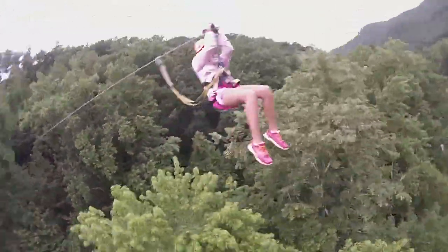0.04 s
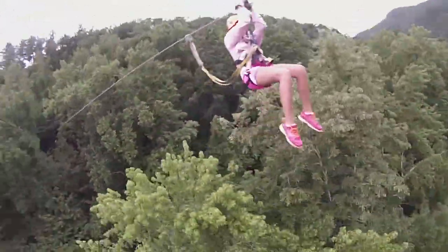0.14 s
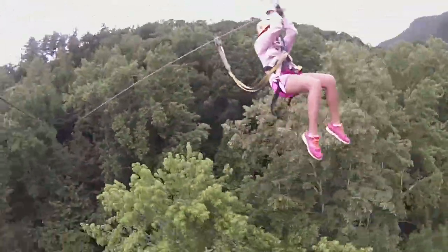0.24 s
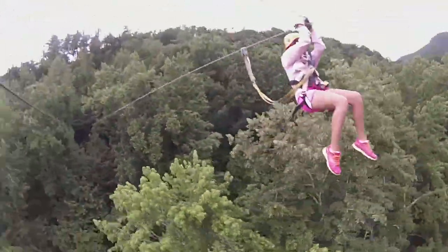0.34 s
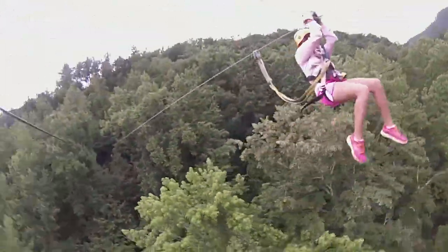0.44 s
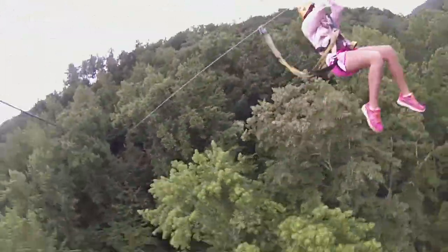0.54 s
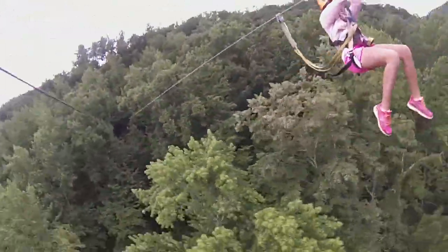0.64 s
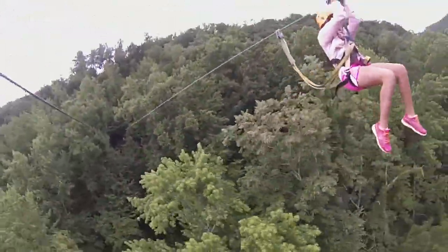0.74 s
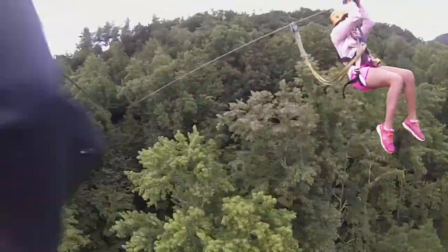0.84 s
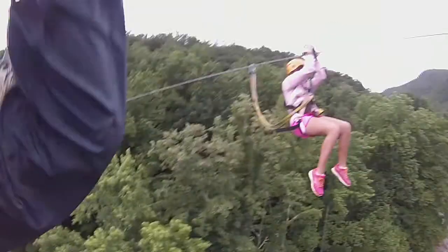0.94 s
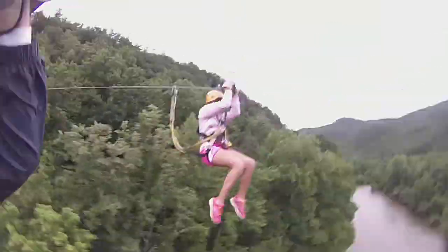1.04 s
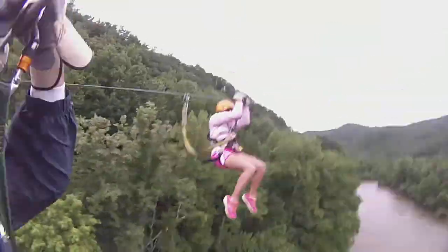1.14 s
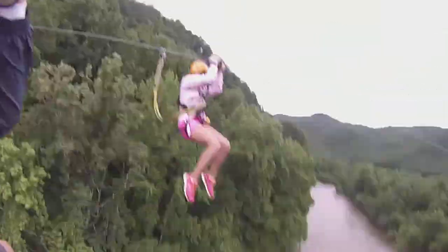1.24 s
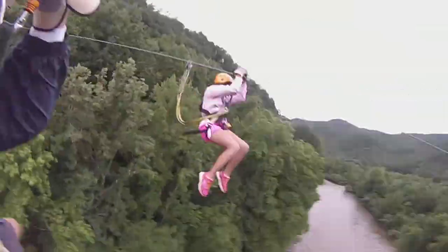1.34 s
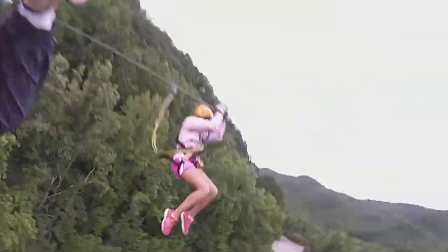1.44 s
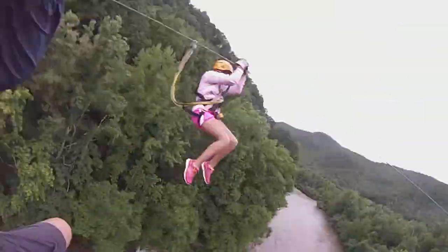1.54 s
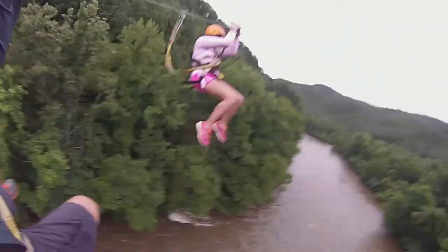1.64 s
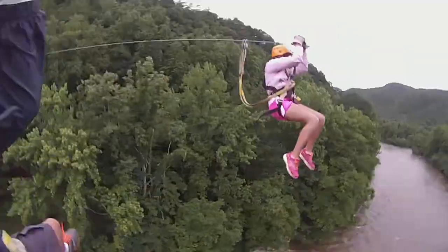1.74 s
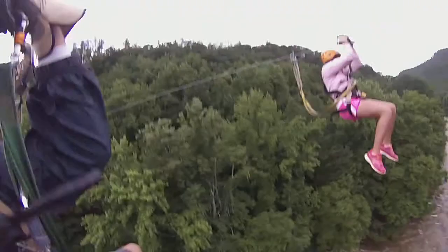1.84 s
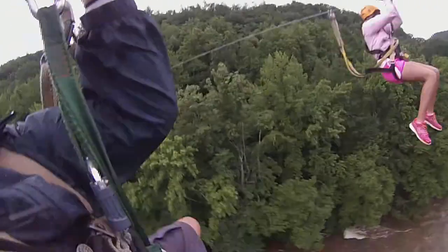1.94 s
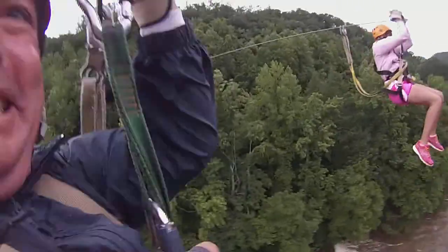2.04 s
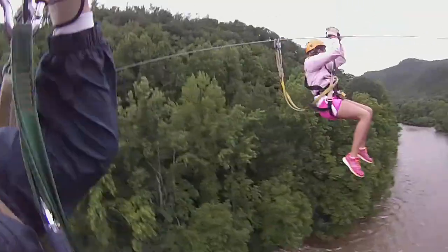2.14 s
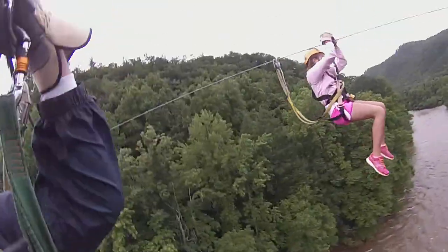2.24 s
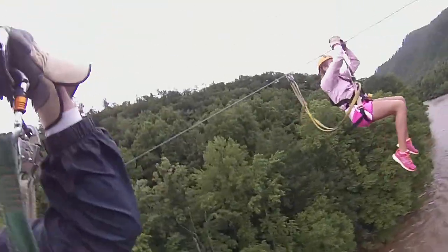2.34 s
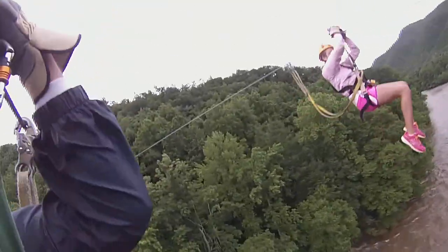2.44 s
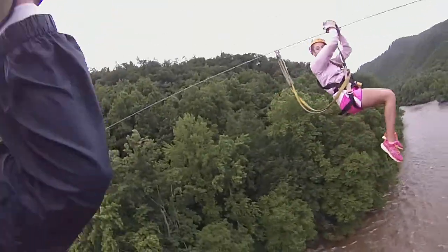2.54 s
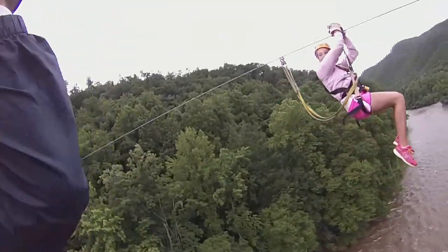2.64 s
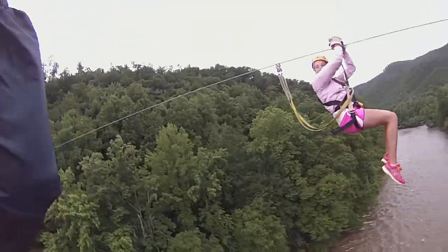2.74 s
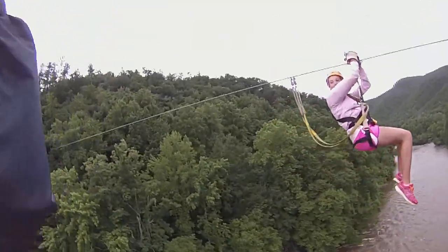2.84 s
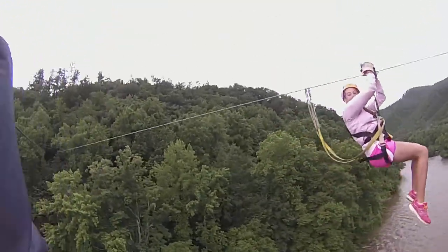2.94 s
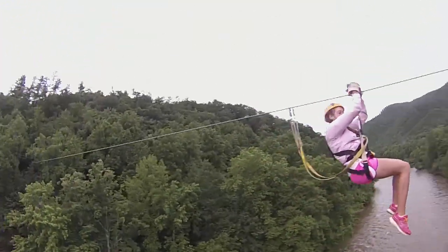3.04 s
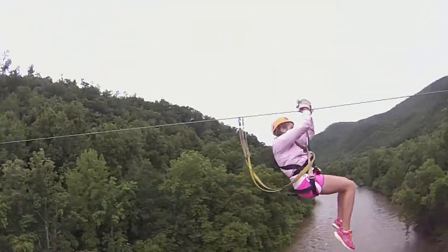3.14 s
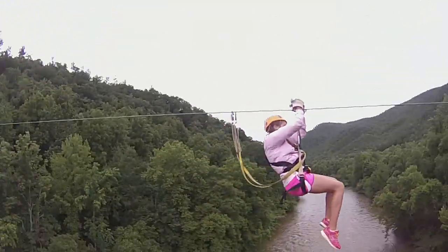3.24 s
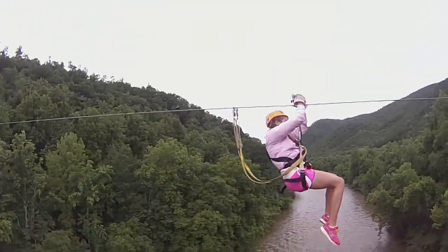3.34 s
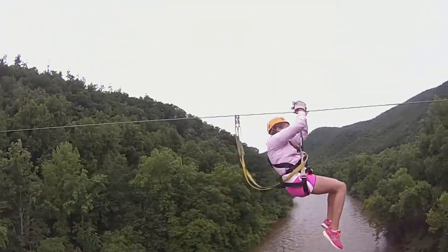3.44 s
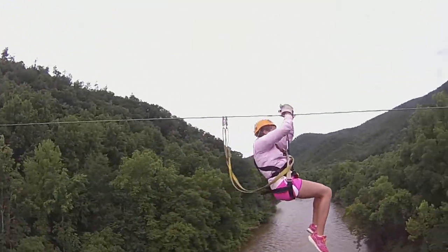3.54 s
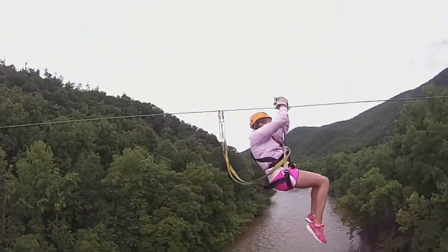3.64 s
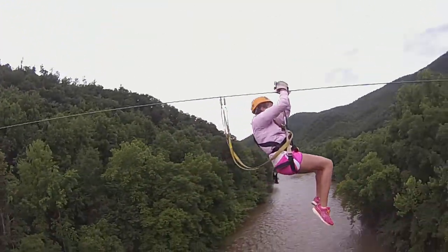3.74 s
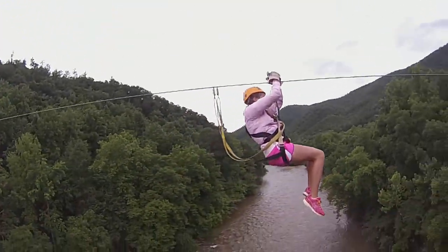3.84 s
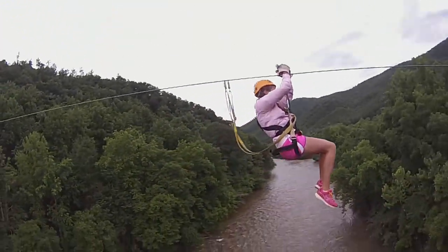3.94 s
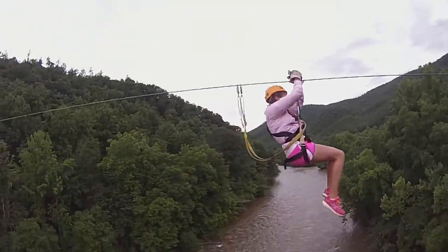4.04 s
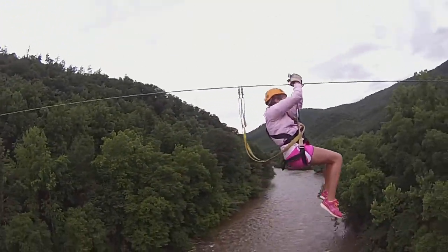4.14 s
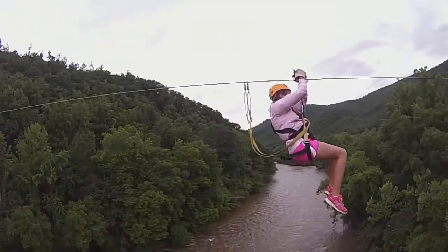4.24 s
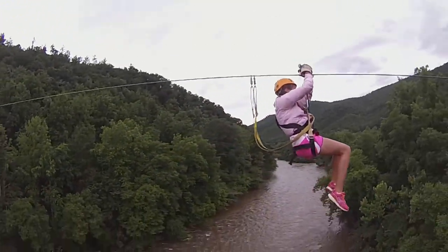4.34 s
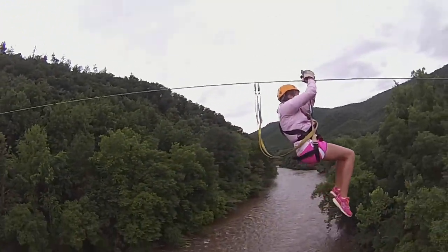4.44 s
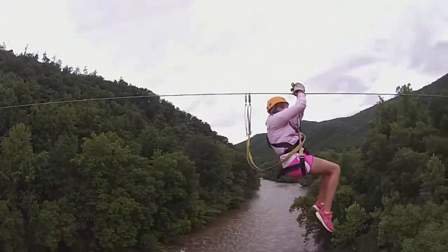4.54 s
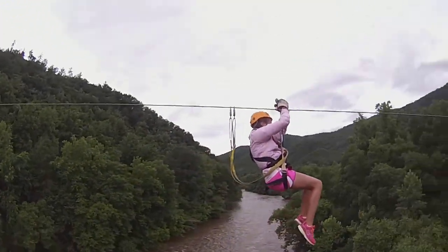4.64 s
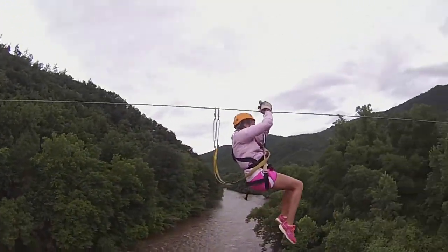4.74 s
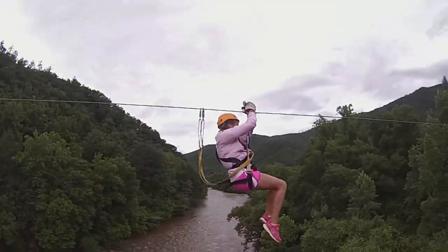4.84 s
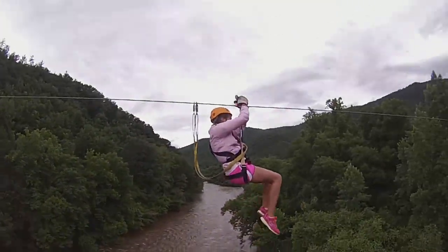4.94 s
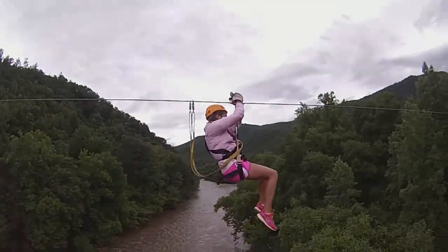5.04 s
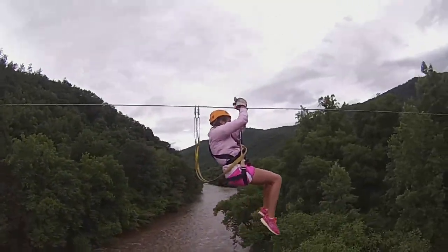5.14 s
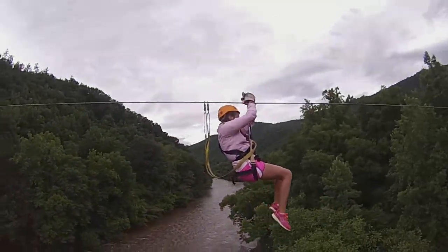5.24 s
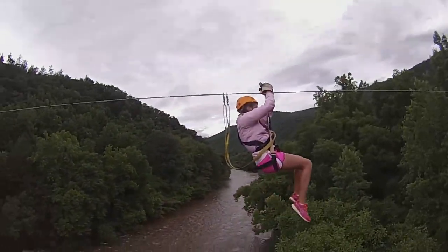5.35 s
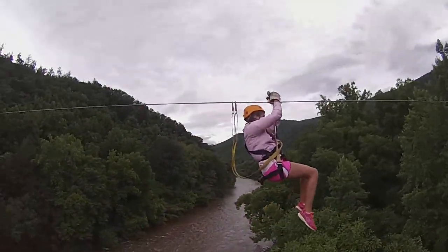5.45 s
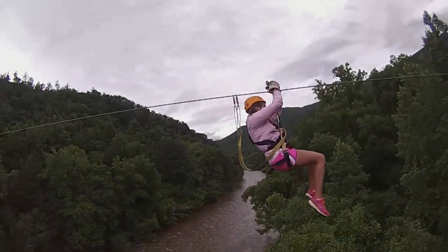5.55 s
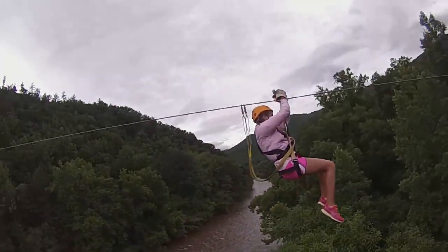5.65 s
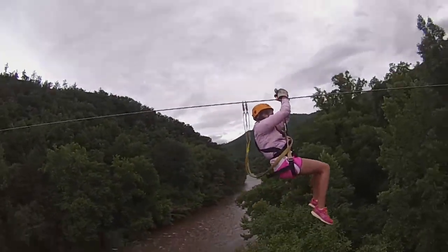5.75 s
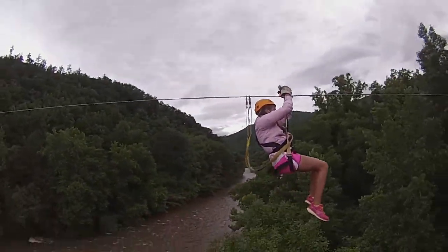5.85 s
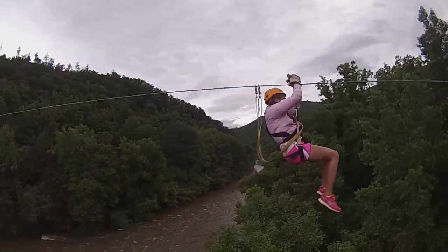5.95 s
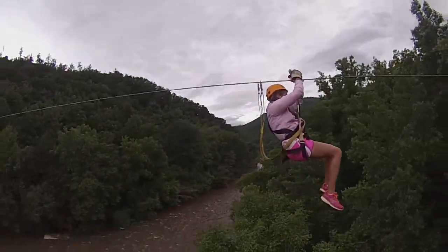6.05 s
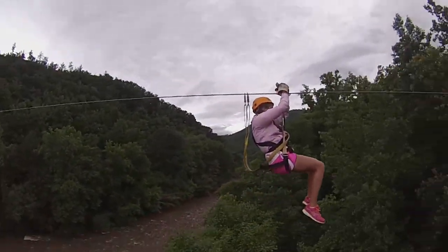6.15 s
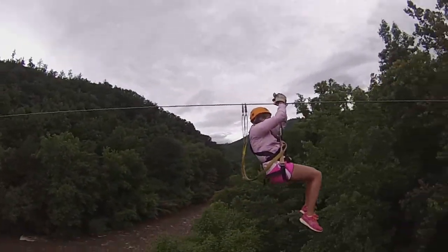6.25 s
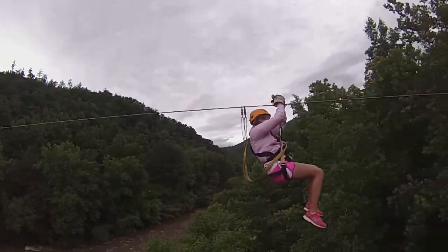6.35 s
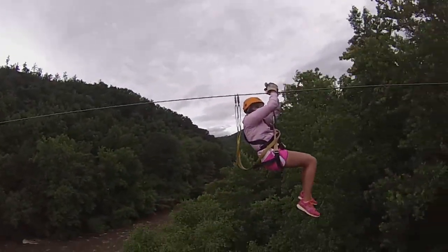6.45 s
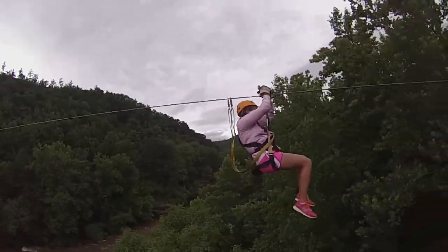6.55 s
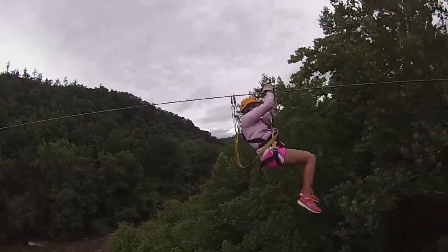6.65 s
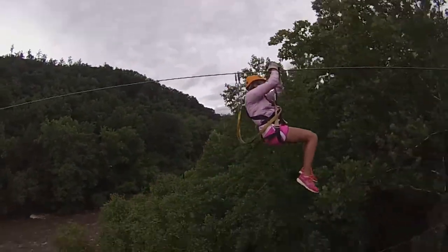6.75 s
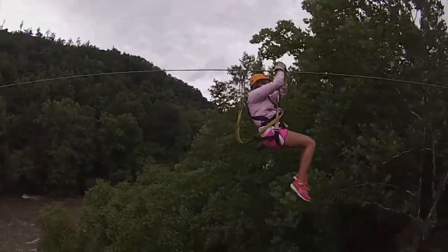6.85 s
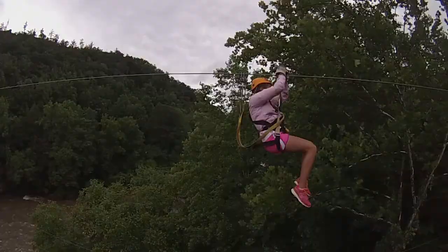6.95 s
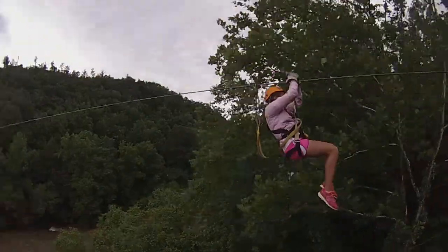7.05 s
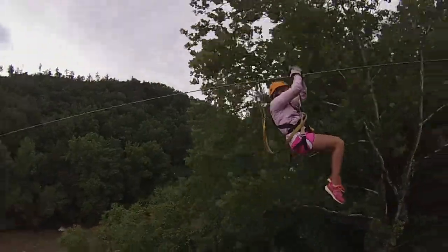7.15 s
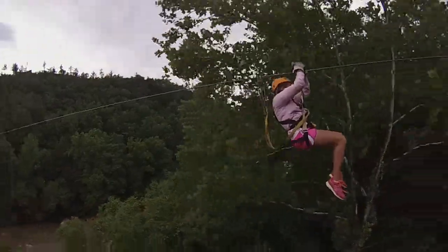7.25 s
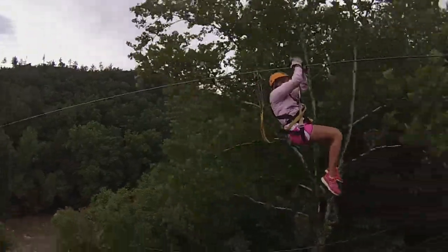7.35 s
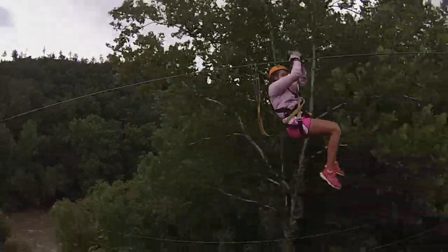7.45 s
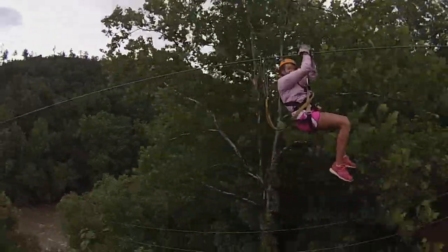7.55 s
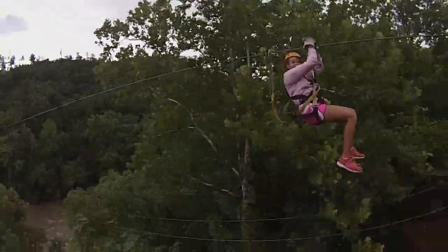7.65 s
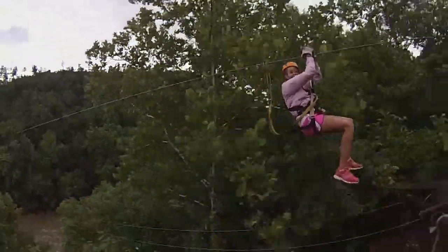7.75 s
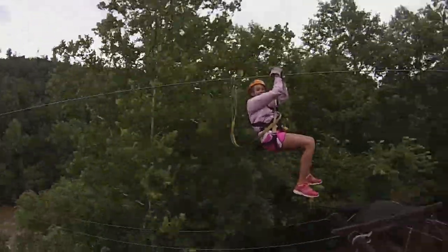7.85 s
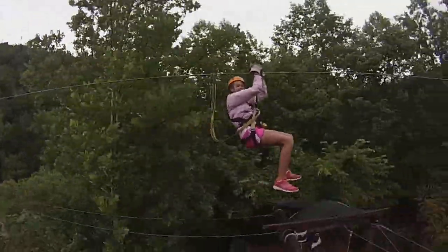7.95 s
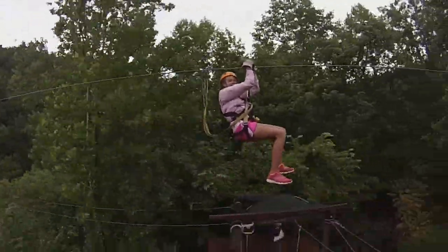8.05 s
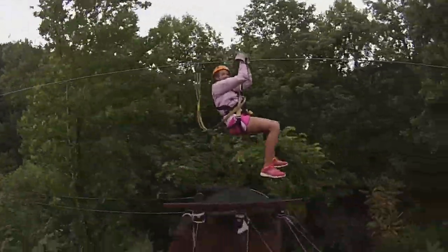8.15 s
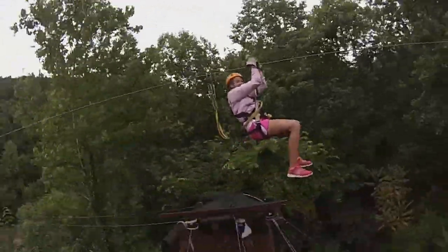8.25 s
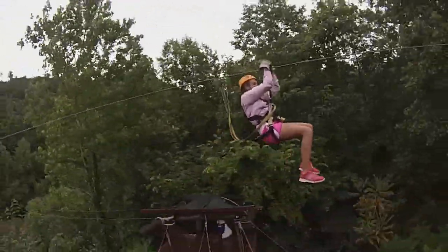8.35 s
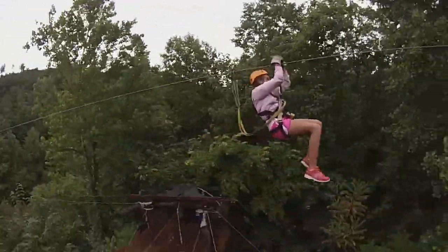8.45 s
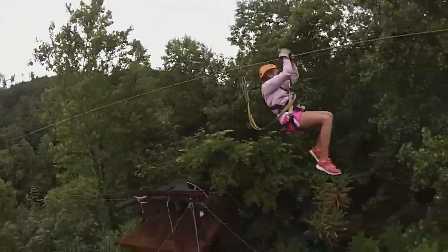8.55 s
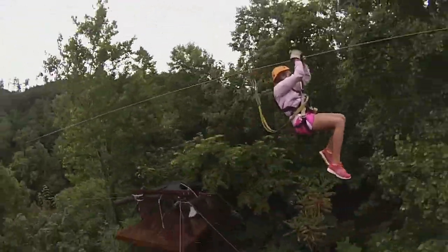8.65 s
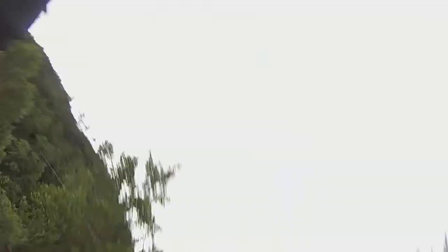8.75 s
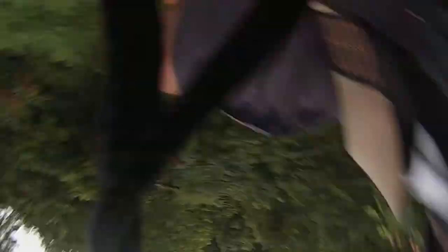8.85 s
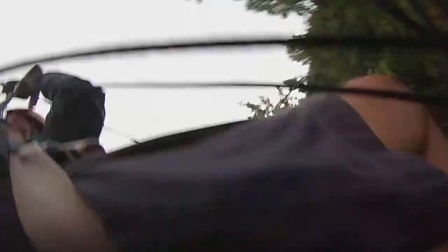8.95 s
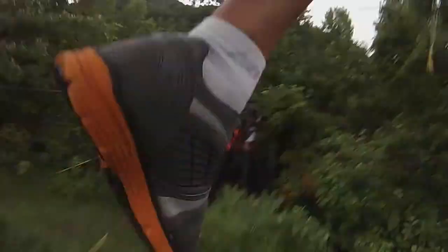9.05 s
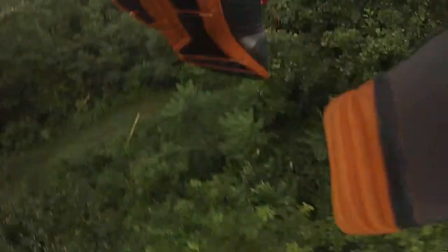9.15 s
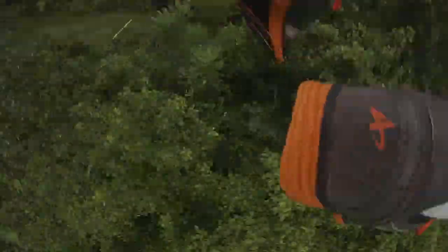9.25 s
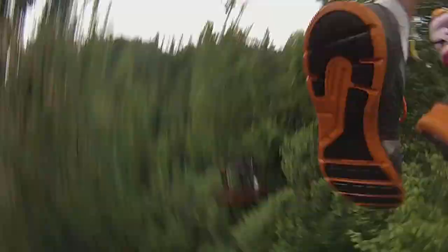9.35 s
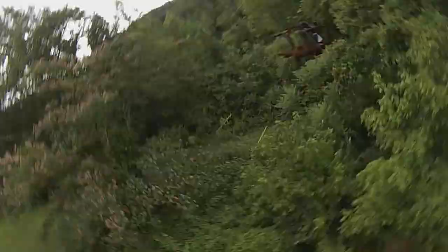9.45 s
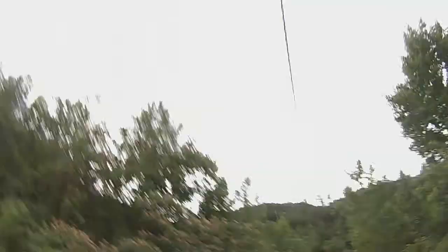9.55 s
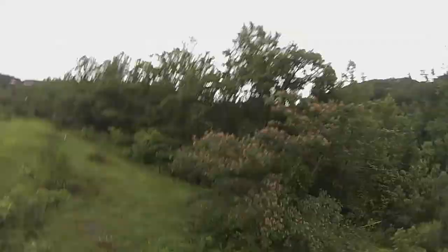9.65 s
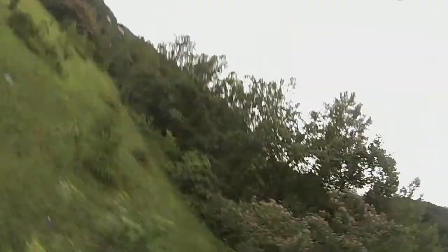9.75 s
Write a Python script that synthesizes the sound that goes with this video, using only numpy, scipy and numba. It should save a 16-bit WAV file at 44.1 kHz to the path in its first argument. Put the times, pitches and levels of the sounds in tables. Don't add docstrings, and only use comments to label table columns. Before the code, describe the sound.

A handheld camera's microphone rides high on a cable in open air. Gritty metallic hiss and rough gliding tones dominate, with low wind buffets strongest early. Bumps interrupt near one second; afterwards the wheel's whine becomes higher, brighter and pulsing as the cable bounces. Late jolts duck the sound, plastic casing and harness clatter sharply, then quiet muffled trolley noise remains.

```python
import sys
import numpy as np
from scipy import signal
from scipy.io import wavfile
from scipy.ndimage import uniform_filter1d
from numba import njit

SR = 44100
rng = np.random.default_rng(int(sys.argv[2]) if len(sys.argv) > 2 else 0)


def convert_level_to_amplitude(level_db):
    exponent = np.asarray(level_db, float) / 20
    return 10 ** exponent


def persist_wave(psi):
    counts = np.round(np.clip(psi, -1, 1) * 32767).astype(np.int16)
    wavfile.write(sys.argv[1], SR, np.atleast_2d(counts).T)


N = 431738
T = np.arange(N) / SR
DROP_S = 9.06
CRUISE_HZ = 900


def curve(table):
    s, *columns = np.transpose(table)
    return [np.interp(T, s, column) for column in columns]


@njit
def svf(x, hz, width):
    y, band, low = np.empty(len(x)), 0., 0.
    for i in range(len(x)):
        g, k = np.tan(np.pi * hz[i] / SR), width / hz[i]
        v = (band + g * (x[i] - low)) / (1 + g * (g + k))
        band, low, y[i] = 2 * v - band, low + 2 * g * v, k * v
    return y


def ring(hz, width_hz, size=N):
    hz = np.minimum(hz * np.ones(size), SR / 2.3)
    once = svf(rng.standard_normal(size), hz, 1. * width_hz)
    twice = svf(once, hz, 1. * width_hz)
    return twice / twice.std()


def walk(rate):
    hold = int(SR / rate)
    steps = np.repeat(rng.standard_normal(N // hold + 1), hold)
    return 1.3 * uniform_filter1d(uniform_filter1d(steps, hold), hold)[:N]


def tone(hz, width_hz, flicker_db):
    phase = 2 * np.pi * np.cumsum(hz + width_hz * walk(60)) / SR
    return np.sqrt(2) * convert_level_to_amplitude(flicker_db * walk(22)) * np.sin(phase)


def outside(s, length):
    return np.maximum(s - T, 0), np.maximum(T - s - length, 0)


def window(s, length, edge_s):
    return np.exp(-(sum(outside(s, length)) / edge_s) ** 2)


def spell(s, length, size):
    return size * window(s, length, 0.14)


def skirt_db(hz, centre_hz, width_hz):
    return -10 * np.log10(1 + ((hz - centre_hz) / width_hz) ** 4)


# start_s, level_db
WIND_BUFFETS = [(0.0, -30.5), (0.43, -41), (0.87, -28.5), (1.45, -22.5), (2.07, -23), (2.29, -32),
                (3.19, -33.5), (4.3, -43.5), (4.61, -37.5), (5.5, -40.5), (5.83, -35), (6.3, -48),
                (7.3, -38.5), (8.26, -40), (8.7, -36), (9.0, -42), (9.79, -47.5)]
# pitch_hz, level_db (per Hz)
RUSTLE_SPECTRUM = [(35, -29), (60, 3.5), (310, -15.5), (398, -19), (834, -19), (911, -4), (982, -35),
                   (1200, -26), (1560, -43), (2640, -120)]
# start_s, length_s, level_db
RUSTLE_GUSTS = [
    (0.302, 0.27, 3),
    (4.447, 0.13, 2.5),
    (5.2, 0.77, -0.5),
    (6.346, 0.055, 3.5),
    (7.449, .25, 4),
]


def wind():
    buffet_db = curve(WIND_BUFFETS)[0]
    rustle_db = -42.5 + 0.011 * (buffet_db + 42.5)
    rustle_db += spell(2.63, 0.3, -7)
    rustle_db += sum(spell(*row) for row in RUSTLE_GUSTS)
    gust = walk(11)
    buffet = ring(33.7, 18.7) + convert_level_to_amplitude(-14.5) * ring(67, 70) + convert_level_to_amplitude(5.5) * ring(15.1, 11.5)
    f, db = np.transpose(RUSTLE_SPECTRUM)
    rustle = np.zeros(N)
    for hz in 70 * 2 ** np.arange(0, 4.1, .5):
        band_db = np.interp(np.log(hz), np.log(f), db) + 1.7 * gust + 2.4 * walk(15)
        rustle += convert_level_to_amplitude(band_db) * np.sqrt(hz) * ring(hz, hz / 2)
    return convert_level_to_amplitude(buffet_db + 2.5 * gust) * buffet + convert_level_to_amplitude(rustle_db + 3.0) * rustle / rustle.std()


# start_s, pitch_hz, level_db
OTHER_TROLLEY = [(0, 1572, -37), (.55, 1631, -30.5), (.7, 1610, -34), (.76, 1625, -42), (1.1, 1640, -33),
                 (1.3, 1646, -25.5), (1.85, 1692, -36), (2.3, 1710, -48), (3.05, 1742, -33),
                 (4.2, 1772, -31), (5.5, 1850, -46), (6.35, 1812, -31), (7.4, 1792, -35.5),
                 (7.8, 1813, -47), (8.3, 1785, -34), (9, 1796, -32.5)]


def other_trolley():
    hz, level_db = curve(OTHER_TROLLEY)
    return convert_level_to_amplitude(level_db) * tone(hz, 2.88, flicker_db=2.0)


# start_s, level_db (peak), pitch_hz, decay_s
THUDS_IN = [(0.896, -2.5, 204, 0.0024), (0.907, 3.5, 56.4, 0.0086), (1.419, -7, 40, 0.0093),
            (1.4255, 0.5, 80, 0.0029), (1.548, -6, 92, 0.0065), (1.713, -22, 290, 0.002),
            (8.774, -3, 51.9, 0.011), (8.779, -6, 193, 0.0043), (9.0576, 12.5, 98, 0.0022),
            (9.15, -22, 70, .01), (9.164, -11, 126, 0.01), (9.184, -10, 170, .003),
            (9.179, -4, 480, 0.0025), (9.188, -5, 47, 0.011), (9.482, -18.5, 32, .03)]
# start_s, level_db (peak), pitch_hz, decay_s
THUDS_OUT = [(0.9, -1, 88.5, 0.016), (1.276, -4.5, 58, 0.0097), (3.192, -28, 287, 0.0096),
             (3.31, -24, 280, 0.01), (3.63, -31, 290, 0.011), (5.61, -14, 62.6, 0.011),
             (8.85, -5, 58, 0.017), (8.925, -9, 299, 0.0014), (8.952, -14, 220.5, 0.0018),
             (9.061, 4, 39.7, 0.0045), (9.1794, 5.5, 160, 0.0025), (9.181, -5, 89, 0.0059),
             (9.505, -23, 76.4, 0.016), (9.59, -34, 90, 0.011), (9.75, -21, 40, .03)]


def thuds():
    out = np.zeros(N)
    for way, table in ((-0.92, THUDS_IN), (0.65, THUDS_OUT)):
        for s, db, hz, decay in table:
            t = np.maximum(T - s, 0)
            swing = np.sin(2 * np.pi * hz * t) * np.exp(-t / decay)
            out += way * convert_level_to_amplitude(db) * swing * np.tanh(t * hz * 8)
    return out


# start_s, level_db (drop)
LEVEL_DUCKS = [(0.909, 18.5), (0.97, 2), (1.431, 3.5), (1.566, 7), (8.78, 5.5), (8.8, 2), (8.897, 4),
               (8.968, 2.5), (9.0, 2.5), (9.03, 1.5), (9.043, 6), (9.0573, 11), (9.125, 10), (9.19, 6)]


def level_drop_db():
    drop_db, attack_s, recover_s = np.zeros(N), 0.0045, 0.07
    for s, db in LEVEL_DUCKS:
        t = np.maximum(T - s, 0)
        drop_db += db * (1 - np.exp(-t / attack_s)) * np.exp(-t / recover_s)
    return drop_db


def add_knock(out, s, db, hz, width_hz, rise_s, decay_s, sharp):
    i = int(s * SR) - 2048
    t = T[i:i + 8192] - s
    burst = ring(hz, width_hz, size=8192)[:len(t)]
    if sharp:
        burst = 0.24 * burst - 2.57 * np.sin(2 * np.pi * hz * np.maximum(t, 0))
    out[i:i + 8192] += convert_level_to_amplitude(db) * burst * np.exp(np.where(t < 0, t / rise_s, -t / decay_s))


# start_s, level_db (rms), pitch_hz, decay_s
CASING_TICKS = [(1.43145, -10, 1530, 0.00054), (1.4316, -23, 2580, 0.00033), (9.057, -11.5, 1800, 0.00072),
                (9.0575, -14.5, 5000, 0.00044), (9.06, -24, 3330, 0.00076), (9.092, -33, 795, .002),
                (9.099, -24, 680, 0.014), (9.0995, -34, 3500, .0015), (9.099, -20, 1900, .0012),
                (9.104, -17.5, 1490, 0.0011), (9.106, -25, 1900, 0.00082), (9.116, -22, 880, 0.00072),
                (9.116, -28, 2300, .001), (9.12, -13.5, 1600, 0.0014), (9.1216, -14.5, 2470, 0.0011),
                (9.1198, -20, 5000, .001), (9.1208, -17, 7000, 0.00092), (9.145, -33, 3220, .002),
                (9.162, -28, 1300, 0.0017), (9.199, -26.5, 2240, .002), (9.5003, -25, 1300, 0.0007),
                (9.12, -37, 12000, 0.00092)]


def casing_ticks():
    out = np.zeros(N)
    for s, db, hz, decay in CASING_TICKS:
        add_knock(out, s, db, hz, min(1.2 * hz, 5000), .0003, decay, sharp=True)
    return out


# start_s, level_db (rms), pitch_hz, width_hz, decay_s
HARNESS_SCRAPES = [(.903, -30, 543, 500, .008), (1.95, -35, 4000, 3000, .03),
                   (1.231, -22.5, 3900, 1300, 0.055), (1.545, -21, 4400, 2500, 0.014),
                   (8.94, -25, 5000, 500, 0.044), (8.779, -27, 591, 700, 0.0096),
                   (8.851, -25, 1500, 2500, 0.016), (8.869, -21, 3500, 700, .006),
                   (8.869, -25, 1700, 1500, 0.0027), (8.885, -27, 680, 400, 0.0092),
                   (8.877, -18, 2200, 1500, 0.0039), (8.881, -22, 1230, 1200, 0.004),
                   (8.884, -27, 3460, 600, 0.0055), (8.888, -19, 2400, 1200, .003),
                   (8.894, -26, 1300, 1500, 0.0017), (8.894, -29, 3400, 700, .002),
                   (8.945, -27.5, 694, 300, 0.0044), (9.062, -14, 1790, 3000, 0.0027),
                   (9.095, -29, 1000, 1500, 0.0024), (9.122, -21, 4000, 5000, 0.0016),
                   (9.126, -26, 1900, 1500, 0.003), (9.139, -38, 1500, 2500, .003),
                   (9.15, -32, 3340, 900, 0.0063), (9.162, -37, 3300, 700, 0.0027),
                   (9.147, -46, 9000, 8000, .004), (9.159, -27, 1190, 1800, 0.0034),
                   (9.179, -29, 890, 1500, 0.0034), (9.199, -34, 2260, 900, 0.0027),
                   (9.195, -27.5, 1040, 1000, 0.0085), (9.11, -32, 1200, 2000, .004),
                   (9.454, -27, 2050, 600, .004), (9.462, -18, 2100, 600, 0.0035),
                   (9.47, -25, 2200, 700, .003), (9.463, -28.5, 3370, 700, 0.008),
                   (9.501, -28, 1290, 2020, 0.0028), (9.54, -34, 2150, 496, 0.0051),
                   (9.74, -38, 4140, 160, 0.055)]


def harness_scrapes():
    out = np.zeros(N)
    for s, db, hz, width, decay in HARNESS_SCRAPES:
        add_knock(out, s, db, hz, width, min(0.82 * decay, 0.012), decay, sharp=False)
    return out


# start_s (first crest), length_s, rate_hz, depth_hz (of strand rate)
CABLE_BOUNCES = [
    (3.06, .9, 8.6, 4),
    (4.22, .42, 8, 8),
    (5.04, .7, 9, 9),
    (5.88, 1.1, 9.2, 6),
    (7.065, .6, 8.9, 11),
    (7.75, .3, 9, 4),
    (8.13, .3, 9.1, 9),
    (8.5, .28, 8.3, 3),
]


def bounce():
    swing_hz = np.zeros(N)
    for s, length, rate, depth in CABLE_BOUNCES:
        swing_hz += depth * window(s, length, .04) * np.cos(2 * np.pi * rate * (T - s))
    return 1 + swing_hz / CRUISE_HZ


# start_s, length_s,
# pitch_hz, glide_hz_per_s, level_db
TROLLEY_STREAKS = [(0, .3, 1445, 150, -36), (.03, .07, 4090, -2500, -38), (.06, .11, 3690, -300, -35),
                   (.05, .1, 2135, 300, -39), (.76, .14, 3810, 0, -39), (1.02, .18, 2295, 450, -41),
                   (1.12, .2, 4890, 0, -39), (1.25, .35, 6100, 200, -45), (1.67, .09, 4310, 700, -34),
                   (1.8, .17, 4430, 900, -38), (1.82, .08, 3760, 0, -36), (1.83, .16, 1735, 0, -32),
                   (1.82, .1, 3310, -700, -39), (1.92, .04, 3260, 2000, -39), (1.96, .09, 3330, -1200, -38),
                   (1.8, .12, 4830, 900, -36), (7.78, .2, 4140, 0, -37), (6.3, .55, 3815, 90, -29),
                   (1.9, .1, 4610, 0, -34), (2.1, .2, 2415, 450, -37), (2.3, .15, 2512, 0, -36),
                   (2.14, .35, 1485, 100, -32), (2.17, .2, 4210, 300, -35), (2.29, .17, 4570, 0, -31),
                   (2.36, .17, 4335, 600, -32), (2.48, .15, 5385, 0, -31), (2.68, .42, 2465, 150, -35),
                   (3.1, .4, 3525, 200, -36), (3.2, .3, 3275, 100, -43), (4.0, .7, 2612, 30, -40),
                   (5.2, 1., 4755, 90, -32), (6.2, .8, 4810, 60, -28), (7.1, .8, 4885, 30, -32),
                   (7.95, .4, 5025, 0, -29), (6.4, .5, 5975, 60, -32), (5.8, 1., 5715, 50, -34),
                   (7.2, 1.4, 5575, 0, -33), (6.8, .2, 2755, 0, -37), (8.79, .055, 3750, -1500, -31),
                   (8.86, .04, 3600, -3000, -31), (8.27, .46, 2752, 50, -40), (8.935, .035, 5055, 0, -26),
                   (8.98, .045, 4955, 0, -29)]


def streaks():
    out, waver = np.zeros(N), bounce()
    for s, length, hz, glide, db in TROLLEY_STREAKS:
        span = slice(max(int((s - .1) * SR), 0), int((s + length + .1) * SR))
        t = T[span] - s
        pitch = (hz + glide * np.clip(t, 0, length)) * waver[span]
        level = convert_level_to_amplitude(db + 2.5 * walk(30)[span]) * window(s, length, .018)[span]
        line = np.sin(2 * np.pi * np.cumsum(pitch * (1 + .0035 * walk(50)[span])) / SR)
        out[span] += level * (1.5 * line + .4 * ring(pitch, hz / 35, size=len(t)))
    return out


# start_s, length_s, pitch_hz, glide_hz_per_s, level_db
GRIT_GLINTS = [(1.1, 0.27, 7000, -800, -37), (1.8, 0.24, 7700, -2800, -29), (2.5, 0.26, 5500, -1000, -28),
               (2.675, 0.41, 7450, 902, -28.5), (8.876, 0.15, 7500, 500, -29),
               (8.95, 0.044, 4500, 2001, -29.5), (1.197, .11, 1590, 397, -22.5), (3.1, .3, 3750, 0, -27.5),
               (1.21, .08, 10500, 0, -47), (1.85, 0.23, 11700, 0, -52), (2.1, .7, 11500, 0, -54),
               (1.8, 1.3, 10000, -300, -60), (2.15, .95, 11000, -1, -48), (1.16, .4, 8800, 0, -47),
               (8.9, .12, 9300, 3000, -40), (9.0, .035, 8800, 8000, -35.5), (8.82, .03, 7400, 4000, -38),
               (8.99, 0.038, 6000, 2, -29)]


def glints():
    out = np.zeros(N)
    for s, length, hz, glide, db in GRIT_GLINTS:
        pitch = hz + glide * np.clip(T - s, 0, length)
        out += convert_level_to_amplitude(db + 2.8 * walk(14.0)) * window(s, length, 0.022) * ring(pitch, hz / 11)
    return out


# start_s, level_db (trolley), brightness_db, facing (share 0-1)
CAMERA_POSE = [(0, -27.5, 0, 0.65), (.7, -28, -4.5, 0.3), (.88, -26, 0.5, 0.97), (1.03, -28.5, 0, 0.1),
               (1.28, -31, 5, 0.3), (1.45, -28.5, 2, 0), (1.74, -30.5, 4, 0.1), (1.86, -27, 2.5, 0.07),
               (2.4, -23.5, 5, 0.29), (2.7, -23.5, 5.5, 0.44), (3.4, -21.5, -1, 0.8), (4.5, -23, 3, 0.81),
               (5.9, -22.5, 4, 0.93), (6.5, -20.5, 3.5, 0.94), (7.8, -24.5, 5.5, 0.73),
               (8.772, -23, 4, 0.29), (8.79, -23.5, -0.5, 0.2), (9.05, -20.5, -2.5, 0.25)]


def pose():
    level_db, bright_db, facing = curve(CAMERA_POSE)
    down = T > DROP_S
    level_db = np.where(down, -34 + 1 * (T - DROP_S), level_db)
    return level_db, np.where(down, -6, bright_db), np.clip(facing, 0, 1)


# start_s, rate_hz (strands passing per second)
STRAND_RATE = [(0, 765), (.5, 778), (1.05, 765), (1.25, 796), (1.52, 820), (1.75, 800), (2.1, 805),
               (2.35, 840), (2.65, 840), (2.82, 826), (3.3, 857), (4.6, 880), (4.82, 896), (5.78, 903),
               (5.9, 914), (7.5, 926), (8.75, 925), (9.1, 914)]


def strand_rate():
    return curve(STRAND_RATE)[0]


# start_s, length_s, level_db (2nd strand multiple), level_db (4th)
WHEEL_SINGS = [(0.0, 0.14, -47, -64), (0.54, 0.16, -36, -46), (1.125, 0.19, -23, -33),
               (1.393, 0.3, -29.5, -56), (1.948, 0.044, -28, -34), (2.128, 0.47, -18.5, -31),
               (3.028, 0.058, -20.5, -40), (3.55, 0.074, -26.5, -57), (4.007, 0.15, -28.5, -41),
               (4.434, 0.14, -27.5, -53), (4.687, 0.3, -23, -39), (5.445, 0.065, -32, -49),
               (5.8, 0.24, -46, -28), (6.403, 0.13, -30, -25), (6.72, 0.11, -37, -26),
               (7.05, 0.03, -28, -40), (7.17, 0.025, -24, -21.5), (7.268, 0.15, -28.5, -21.5),
               (7.45, 0.12, -31, -24), (7.601, 0.12, -25.5, -22.5), (7.71, 0.24, -35.5, -19.5),
               (7.97, 0.31, -25, -23), (8.32, 0.051, -25, -19), (8.464, 0.12, -26.5, -19),
               (8.605, 0.25, -26.5, -20), (8.92, 0.035, -20, -37), (8.98, .05, -21, -40)]
# start_s, length_s, level_db (loss)
TONE_GAPS = [
    (8.787, 0.12, 12),
    (8.972, .006, 9),
    (8.997, .004, 9),
    (9.016, .006, 8),
    (9.038, .015, 13),
    (1.197, 0.024, 7),
]


def singing():
    lead_db = np.array([[-39.5], [-51.5]])
    rise_db_s, fall_db_s = 214, 106
    for s, length, *db in WHEEL_SINGS:
        before, after = outside(s, length)
        lead_db = np.maximum(lead_db, np.array(db)[:, None] - rise_db_s * before - fall_db_s * after)
    return lead_db - sum(db * window(s, length, 0.0071) for s, length, db in TONE_GAPS)


# twist_multiple, leading_tone (0 or 1), level_db (relative to it), width_hz
LEAD_TONES = [
    (11.97, 0, 1, 6.1),
    (24, 1, 1, 13.05),
    (24.3, 1, -13, 26.2),
    (25.1, 1, -6.5, 25.5),
    (23.17, 1, -12, 24.3),
    (33.7, 1, -11, 86),
]


def lead_strands(twist_hz):
    lead_db = singing()
    out = convert_level_to_amplitude(lead_db[0] - 7.0) * ring(12 * twist_hz, 305.0)
    out += convert_level_to_amplitude(lead_db[1] - 6) * ring(24.3 * twist_hz, 290)
    for multiple, lead, db, width in LEAD_TONES:
        lead = int(lead)
        out += convert_level_to_amplitude(lead_db[lead] + db) * tone(multiple * twist_hz, width, flicker_db=1.0 + 1.0 * lead)
    return out


# twist_multiple, pitch_hz (resonance), width_hz, level_db (over trolley), flicker_db
WEAK_TONES = [
    (1, 144.5, 1.4, -20.5, 3.5),
    (6, 870, 75, -18, 1.1),
    (7, 1025, 22, -24, 3.5),
    (11, 1593, 123, -10, 4.5),
    (13, 1985, 34.6, -7.5, 1),
    (14, 2125, 26, -11, 2),
    (18, 2730, 190, -15, 3),
]
# start_s, length_s, level_db
LOAD_SWELLS = [
    (3.65, .4, 2.5),
    (4.7, 0.33, 5),
    (5.9, .35, 2.5),
    (7.303, 0.26, 5),
    (8.096, 0.61, -2.5),
]


def weak_strands(twist_hz):
    level_db, _, facing = pose()
    out = np.zeros(N)
    for multiple, hz, width, db, flicker in WEAK_TONES:
        multiple = round(multiple)
        db = db + level_db - 4 * (1 - facing) - 8 * (T > 8.78)
        if multiple == 6:
            db = db + sum(spell(*row) for row in LOAD_SWELLS)
        db = db + skirt_db(multiple * twist_hz, hz, width)
        out += convert_level_to_amplitude(db) * tone(multiple * twist_hz, .6 * multiple, flicker_db=flicker)
    return out


def fine_strands(twist_hz):
    level_db, bright_db, facing = pose()
    fine_db = level_db + bright_db - 13.5 - 12 * (1 - facing)
    out = np.zeros(N)
    for multiple in range(34, 40):
        hz = multiple * twist_hz
        db = fine_db + 3 * walk(4) + skirt_db(hz, centre_hz=5040, width_hz=420)
        out += convert_level_to_amplitude(db) * tone(hz, 18., flicker_db=3.)
    return out


def strands():
    twist_hz = strand_rate() * bounce() / 6
    return lead_strands(twist_hz) + weak_strands(twist_hz) + fine_strands(twist_hz)


def blur():
    patches = np.zeros(N)
    for k in range(6):
        hz, width = 3500 * 1.2 ** k, .8 * 2000 * 1.2 ** k
        patches += convert_level_to_amplitude(3.5 * walk(8) - 1.8 * k) * ring(hz * (1 + .05 * walk(3)), width)
    return patches / patches.std()


def wheel(rate_hz, facing):
    turn_db = spell(1.7, 0.82, 8.3)
    rim_hz = 5460 + 3 * np.clip(rate_hz - CRUISE_HZ, -60, 0)
    sing_db = np.maximum(10.25 + skirt_db(6 * rate_hz, centre_hz=5100, width_hz=234), 0)
    rim_db = -5.5 - turn_db - 8.5 * (1 - facing) + sing_db
    flange_db = -4.5 - 6 * (1 - facing)
    low_db = -15 + turn_db - 8.3 + (-5 + 0.18 * turn_db) * walk(9.2)
    out = convert_level_to_amplitude(rim_db + walk(8.8)) * ring(rim_hz, 405)
    out += convert_level_to_amplitude(flange_db + 0.82 * walk(9.1)) * ring(4830, 780)
    return out + convert_level_to_amplitude(low_db) * ring(4430 * (1 + 0.0076 * walk(4)), 410)


# level_db, brightness_share, away_loss_db
TROLLEY_PARTS = [
    (-0.37, 0.038, 1),
    (1, 0.041, 9.5),
    (-0.06, 0.86, -2.5),
    (-6, 0.97, 0),
]
# pitch_hz, width_hz, level_db, part (row of the parts above)
FRAME_MODES = [(1607, 550, -3, 0), (2074, 790, -2.5, 0), (2482, 270, -12, 0), (1235, 1300, -49, 0),
               (3720, 250, -3.5, 1), (3903, 390, -2.5, 1), (3000, 480, -6, 1), (5940, 870, -10, 2),
               (7680, 1500, 1, 3), (8185, 500, -1.5, 3), (11800, 3000, -19, 3), (14400, 2500, -31.5, 3)]


def grit():
    level_db, bright_db, facing = pose()
    rate_hz = strand_rate()
    part_db = [level_db + db + share * bright_db - away_db * (1 - facing)
               for db, share, away_db in TROLLEY_PARTS]
    part_db[3] = part_db[3] - 2 * (T > DROP_S)
    blur_db = -1.5 - 29.5 * facing ** 2
    shimmer_db = 5.5 - 26.0 + 0.122 * np.maximum(rate_hz - CRUISE_HZ, -80)
    out = convert_level_to_amplitude(part_db[2] - 1.0) * (wheel(rate_hz, facing) + convert_level_to_amplitude(blur_db) * blur())
    out += convert_level_to_amplitude(part_db[3] + shimmer_db) * ring(9820, 850)
    for hz, width, db, part in FRAME_MODES:
        part = int(part)
        mode_db = part_db[part] + db - 3.5 + 0.34 * walk(2.57) + 0.83 * walk(12)
        lift = (rate_hz / CRUISE_HZ) ** (0.5 * (part == 0))
        sag = 0.07 * (part == 3) * (1 - facing)
        out += convert_level_to_amplitude(mode_db) * ring(hz * lift * (1 - sag + 0.0078 * walk(1.62)), width)
    return out


# start_s, length_s, share
WRIST_COVERS = [
    (1.0, .08, .5),
    (1.4, .35, 0.31),
    (3.34, 1.42, 0.47),
    (8.2, 0.42, .75),
]


def through_casing(sound):
    sound = sound - .62 * svf(sound, np.full(N, 3030.), 650.)
    covered = np.minimum(sum(spell(*row) for row in WRIST_COVERS), .9)
    for hz in (2850, 3200):
        sound = sound - covered * svf(sound, np.full(N, 1. * hz), 380.0)
    return sound


def trolleys():
    sway_db = 1.0 * walk(6) + 0.11 * walk(25) + .5 * walk(140)
    sway_db += 2 * (1 - pose()[2]) * walk(18)
    above = convert_level_to_amplitude(sway_db) * strands() + other_trolley() + glints()
    return through_casing(convert_level_to_amplitude(sway_db) * grit() + above * (T < DROP_S))


def scene():
    airborne = trolleys() + wind() + streaks()
    handling = thuds() + casing_ticks() + harness_scrapes()
    return (airborne * convert_level_to_amplitude(-level_drop_db()) + handling)[None]


def roll_off(x):
    return signal.sosfilt(signal.butter(12, 16100, fs=SR, output="sos"), x)


def record(dry):
    top = signal.ellip(8, .2, 60, 15250, fs=SR, output="sos")
    mix = np.clip(signal.sosfilt(top, dry), -.995, .995)
    return roll_off(mix)


dry = scene()
out = record(dry)
persist_wave(out)
```